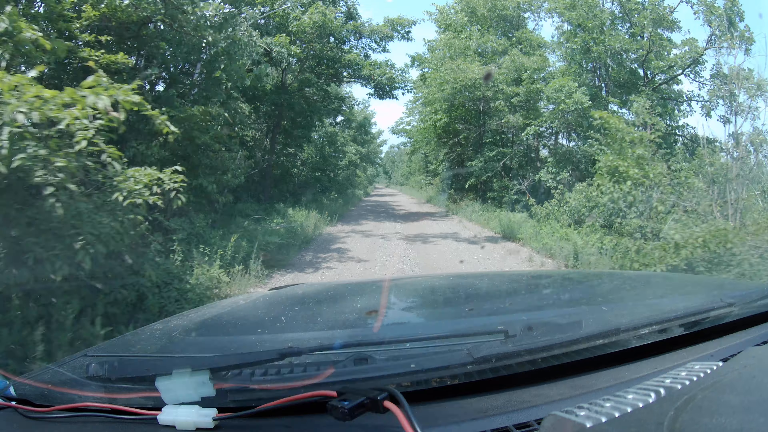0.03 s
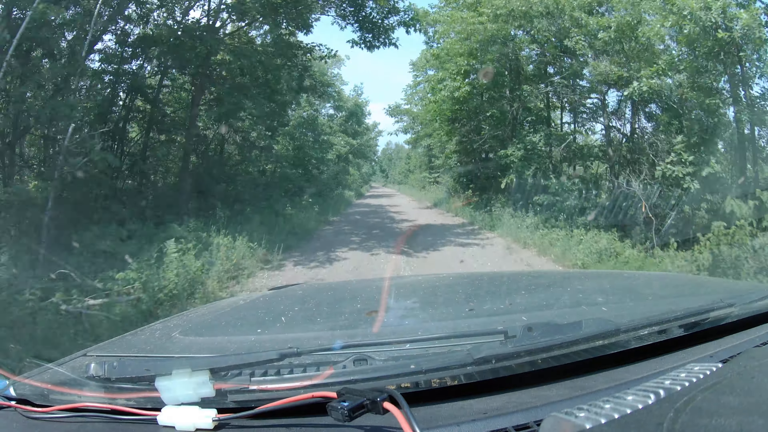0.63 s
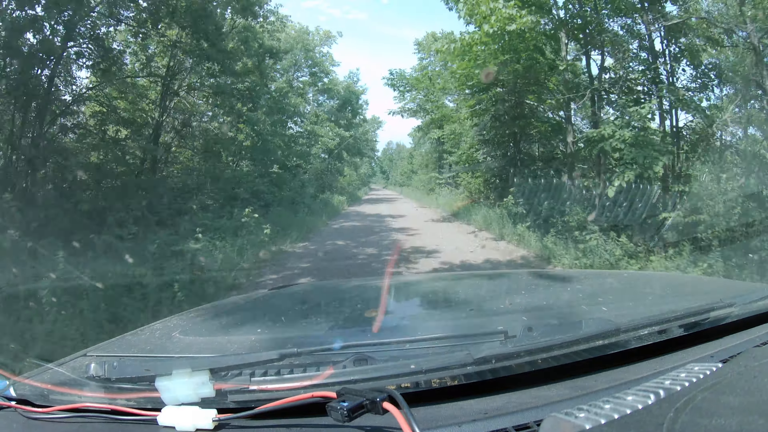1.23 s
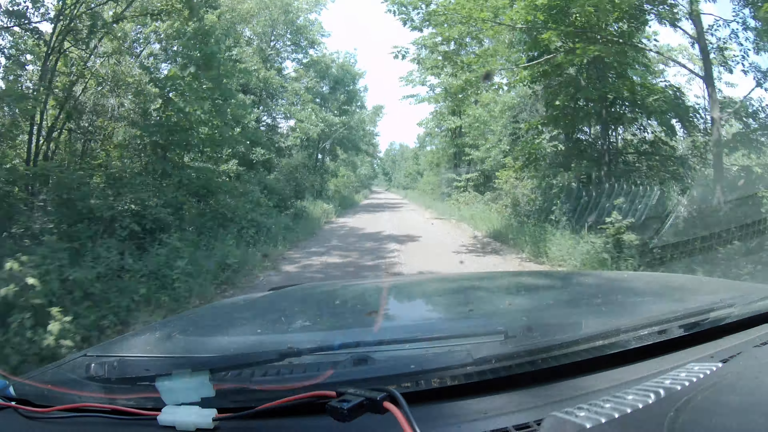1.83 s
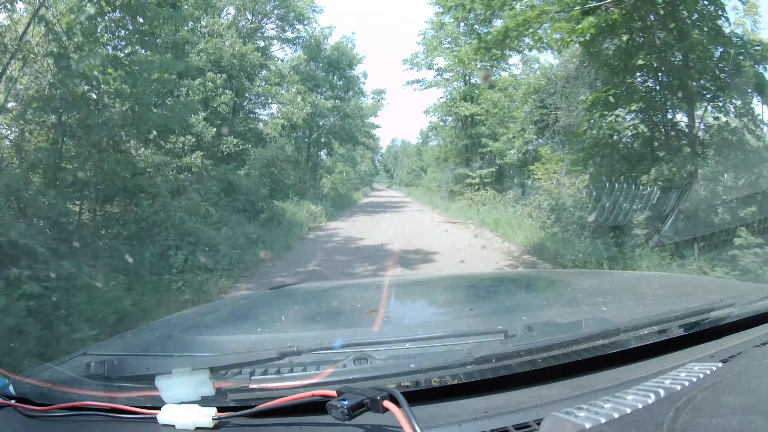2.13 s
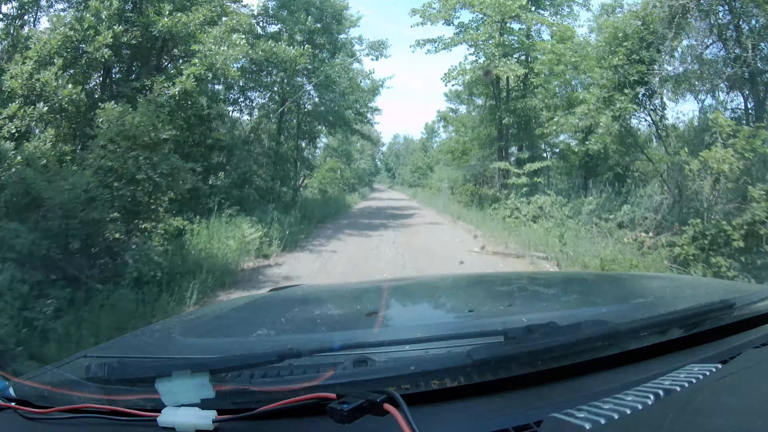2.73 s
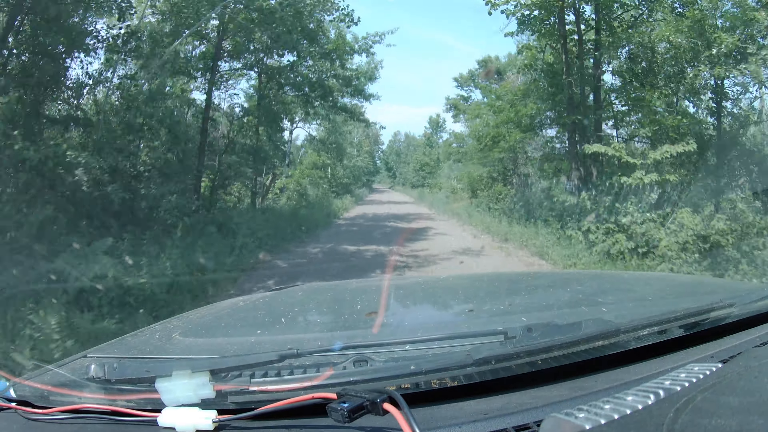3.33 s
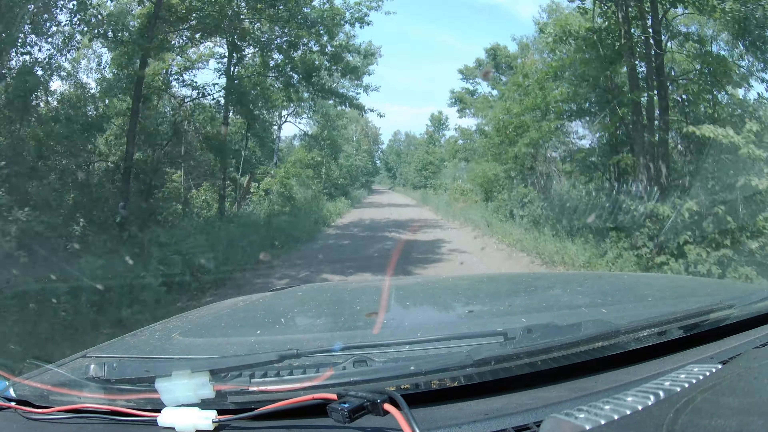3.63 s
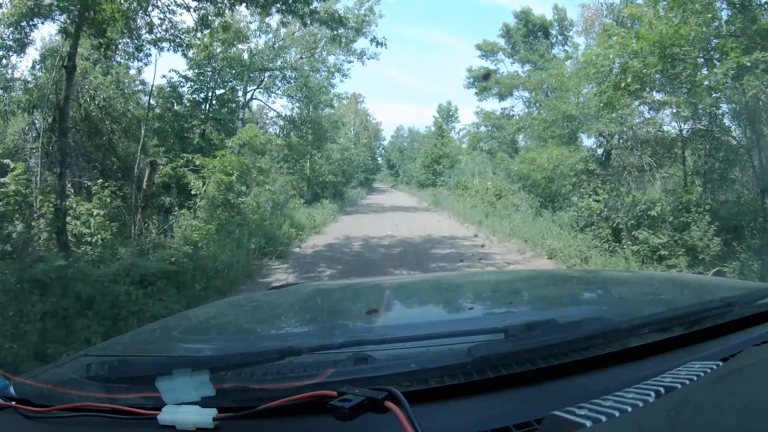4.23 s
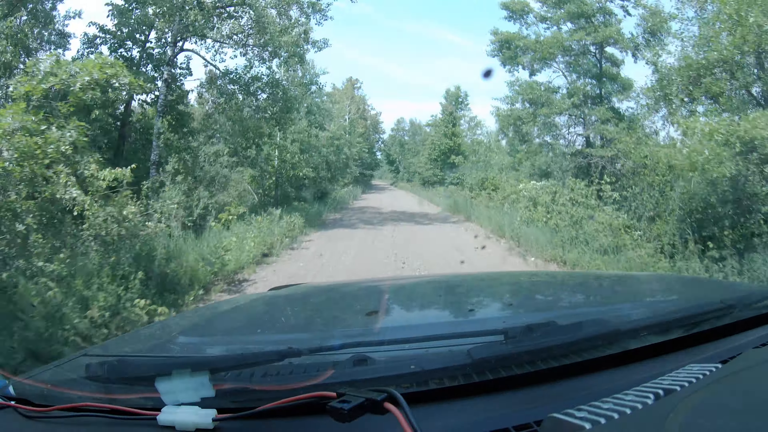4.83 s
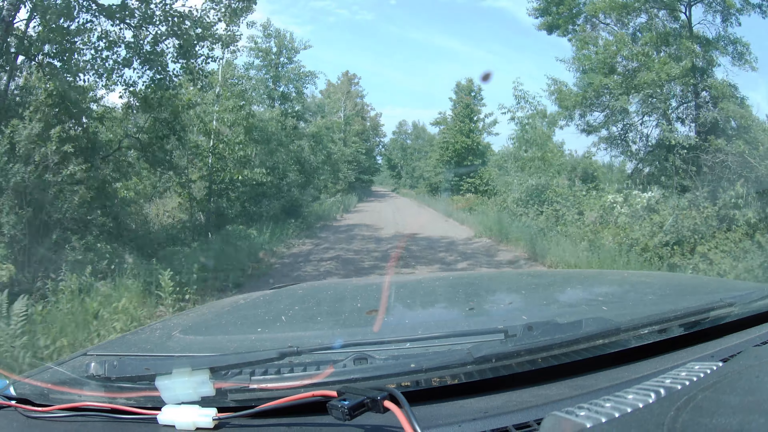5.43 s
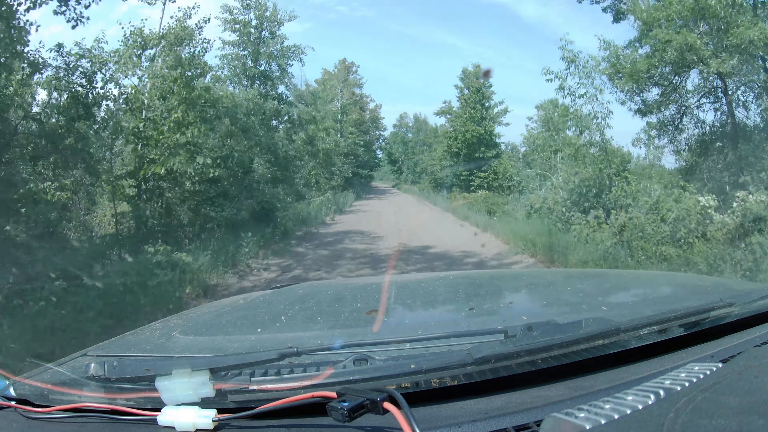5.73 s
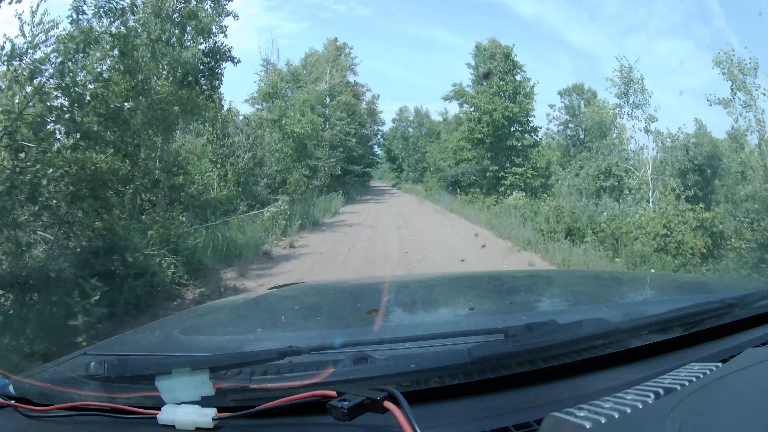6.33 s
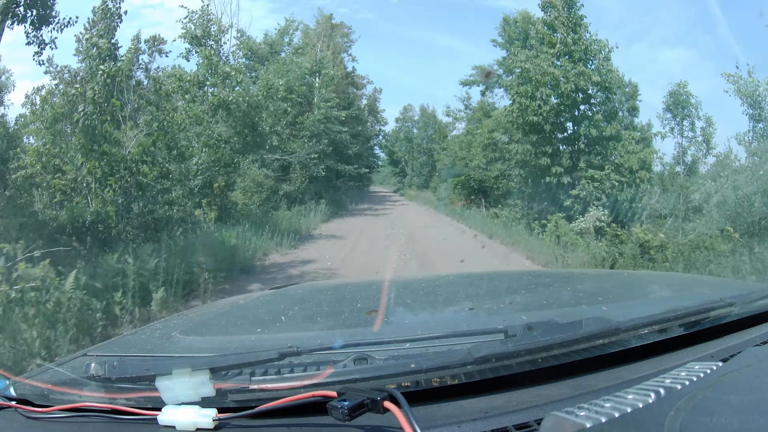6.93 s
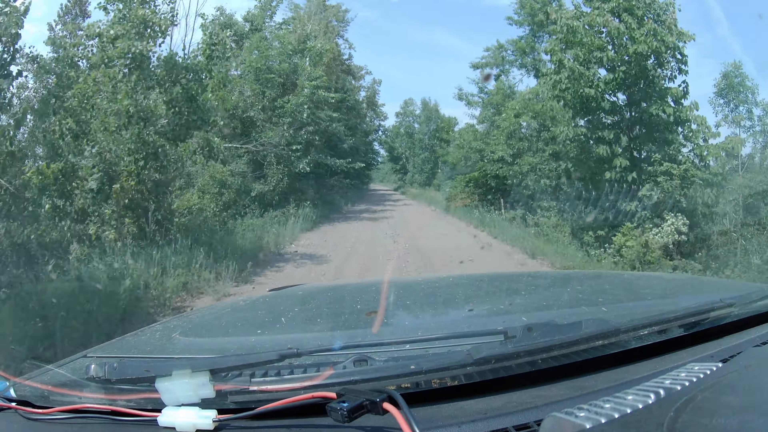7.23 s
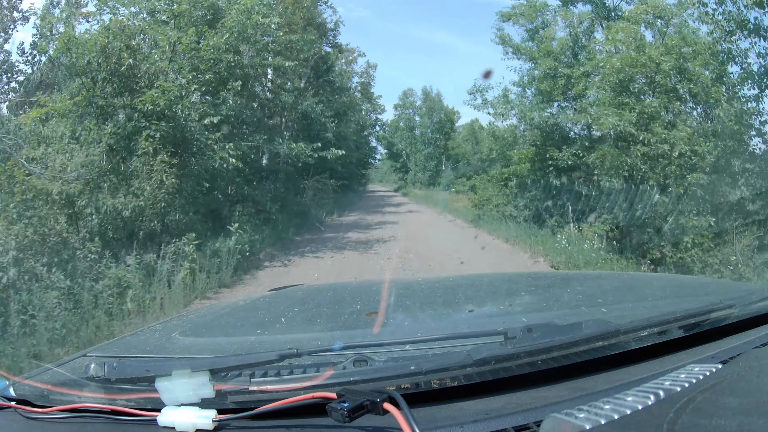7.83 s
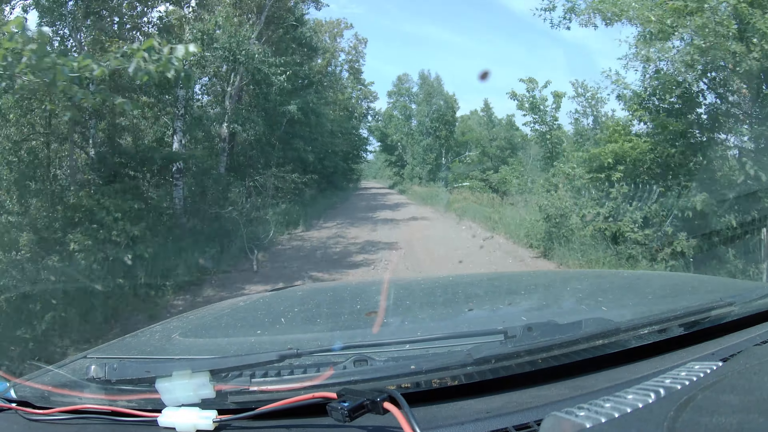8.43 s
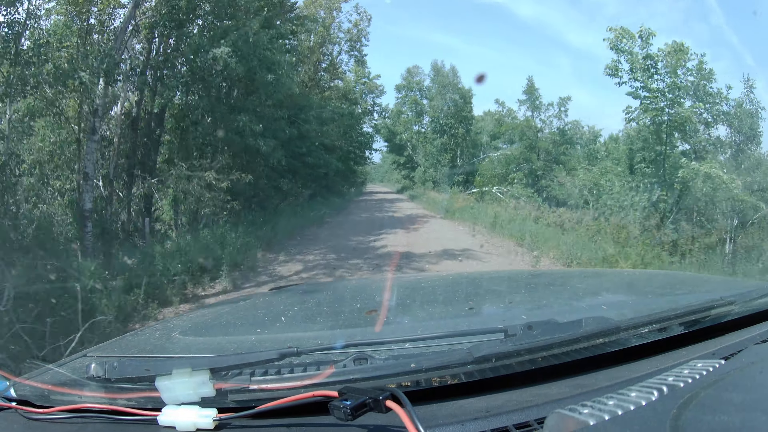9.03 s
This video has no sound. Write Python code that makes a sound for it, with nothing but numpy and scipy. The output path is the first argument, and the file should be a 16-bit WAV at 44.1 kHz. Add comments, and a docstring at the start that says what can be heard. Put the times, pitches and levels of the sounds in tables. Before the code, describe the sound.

A car drives steadily on gravel, heard from inside, with low tire rumble, engine drone and small stones clicking against the underbody.

```python
"""Driving on gravel

A car rolls along a gravel forest trail, heard from the dashboard with the windows shut. The tyres
excite the cabin's air resonances over a low engine drone and fling stones at the underbody,
whose damped modes answer each impact. Bumps thump through the suspension, a heat shield rings,
loose trim rattles, and stick-slip friction draws tiny squeaks from a plastic fitting."""
import sys
import numpy as np
from scipy import signal
from scipy.fft import rfft, irfft, next_fast_len
from scipy.io import wavfile
from scipy.ndimage import uniform_filter1d, minimum_filter1d

SR = 44100
rng = np.random.default_rng(int(sys.argv[2]) if len(sys.argv) > 2 else 0)


def waveform_to_disk(signal):
    """Save audio, clipped to [-1, 1], as 16-bit WAV at the path in sys.argv[1]."""
    frames = np.transpose(np.atleast_2d(signal))
    scaled = np.clip(frames, -1, 1) * 32767
    samples = np.round(scaled).astype(np.int16)
    wavfile.write(sys.argv[1], SR, samples)


N = 404397

# The road surface. Each row: time in seconds, then base levels of boom, roar and crunch in dB.
ROAD = [(0.04, -16, -22.5, -35.5), (1.4, -19, -21.5, -37), (1.79, -18, -22, -35), (2.18, -17.5, -20, -34.5),
        (3.15, -18.5, -21.5, -35), (3.54, -15, -19, -33), (4.12, -18.5, -22.5, -36),
        (4.9, -21.5, -21.5, -35.5), (5.09, -17.5, -20, -36), (5.48, -18.5, -21.5, -35.5),
        (7.03, -17, -19.5, -33.5), (7.62, -16, -20.5, -33.5), (8.39, -17, -21.5, -35),
        (8.78, -17, -16.5, -31), (9.17, -13.5, -19.5, -32.5)]
# Stones striking the underbody. Each row: time in seconds, strength in dB, hardness as spectral
# tilt in dB per octave.
STONES = [(0.0455, -17, -6), (0.1292, -10.5, -0.5), (0.1458, -22.0, -18), (0.181, -25, -17),
          (0.2285, -24, -13), (0.2596, -11.0, -6), (0.2705, -18, -1.5), (0.2852, -22, -16),
          (0.3292, -25, -19), (0.3742, -27, -21), (0.4167, -17.0, -12), (0.4601, -25.5, -15),
          (0.543, -13.0, -4.5), (0.554, -21.5, -7), (0.6102, -22.5, -19), (0.701, -24, -18),
          (0.784, -21.5, -12), (0.798, -16.5, -7), (0.8145, -20, -14), (0.8291, -15.5, -6),
          (0.8342, -20.5, 1.5), (0.8418, -21, -13), (0.8638, -20.5, -6), (0.8845, -34, -26),
          (0.9076, -20, -6.5), (0.9557, -25, -18), (0.9933, -14, 1), (1.0823, -14.0, 1), (1.1235, -13, -6),
          (1.1369, -16.5, -7), (1.2428, -19.5, -8), (1.2827, -16, -0.5), (1.3193, -24, -14),
          (1.365, -16, -7), (1.3874, -17, -3.5), (1.4045, -19, -13), (1.4845, -14, 3), (1.5433, -23, -23),
          (1.6004, -9.5, -3), (1.6254, -16, -7), (1.636, -27, -10), (1.6564, -23, -20), (1.6755, -24, -13),
          (1.7149, -22.5, -8), (1.7222, -20.5, -14), (1.7416, -28, -11), (1.7582, -23, -4),
          (1.8654, -17.5, -2), (1.8712, -15, 1.5), (1.8847, -27, -18), (1.9486, -21.5, -14),
          (1.9594, -20, 2.5), (2.0531, -14.5, 2.5), (2.1017, -13.0, -9), (2.184, -28, -14),
          (2.2001, -18, -9), (2.2144, -26.0, -28), (2.2214, -15, -6), (2.2705, -24, -16),
          (2.3116, -12.5, 2), (2.3277, -23.5, -8), (2.397, -10, 1), (2.4158, -21, -9),
          (2.4277, -18.5, -5.5), (2.4448, -21.5, -16), (2.457, -21, -22), (2.4718, -27, -20),
          (2.5397, -26, -12), (2.5535, -30, -15), (2.6111, -11.5, 0), (2.6447, -33, -20),
          (2.7061, -13.0, 1), (2.7221, -28, -26), (2.74, -22, -5), (2.7479, -24.5, -18),
          (2.7927, -11.5, -10.5), (2.8041, -17, -7), (2.8371, -19.5, -4.5), (2.899, -28, -18),
          (3.0111, -10, -6), (3.0799, -28, -11), (3.098, -29, -12), (3.1219, -11.5, 1.5),
          (3.1348, -22.5, -13), (3.1787, -25, -24), (3.256, -21, -1), (3.2658, -15.5, -12),
          (3.2895, -20.5, -14), (3.3107, -22, -12), (3.3465, -12.5, 1.5), (3.3891, -19.5, -17),
          (3.402, -20.0, -1.5), (3.4072, -17, -1), (3.4538, -17, -5), (3.4783, -24.5, -17),
          (3.505, -18, -10), (3.5412, -11, 1.5), (3.6241, -21.5, -28.5), (3.642, -27.5, -14),
          (3.6534, -24.5, -12), (3.6717, -21, 0), (3.6903, -21, -14), (3.7053, -21.0, -7),
          (3.7237, -29.5, -26), (3.739, -18, -3), (3.773, -17, -2), (3.8069, -22.5, -4.5),
          (3.8866, -19.5, -6), (3.9067, -20, -5), (3.924, -28.0, -10), (3.9597, -24, -3),
          (3.984, -13.5, -10.5), (3.998, -19, -3), (4.0282, -16, -17), (4.035, -20.0, -12),
          (4.0728, -22.5, -3.5), (4.1564, -11.5, 0), (4.199, -16, -5), (4.2302, -17.5, -4.5),
          (4.2806, -29.5, -21), (4.3373, -14, 1.5), (4.3543, -27.5, -8), (4.38, -29, -22),
          (4.4257, -27, -19), (4.4458, -29, -16), (4.4612, -27.5, -9), (4.4689, -26.0, -15),
          (4.4805, -28, -15), (4.5364, -27, -18), (4.5845, -27, -12), (4.667, -17, -19), (4.6852, -28, -15),
          (4.7303, -13.0, -7), (4.742, -19, -2.5), (4.7764, -26.0, -18), (4.7951, -29, -15),
          (4.8446, -20, -3), (4.8613, -23.5, -4), (4.8745, -17.0, -1.5), (4.9915, -18.5, -3.5),
          (5.0148, -29, -17), (5.1003, -11.5, -11), (5.113, -17, -1), (5.1518, -11.5, 0.5),
          (5.164, -18, -12), (5.1788, -15.5, -3), (5.2146, -25, -6), (5.2317, -23, -28), (5.2854, -26, -19),
          (5.3975, -31, -11), (5.446, -28, -8), (5.4627, -14.5, 1), (5.5447, -26.5, -18),
          (5.5858, -26.0, -17), (5.6365, -17.5, -8), (5.71, -23.5, -19), (5.7887, -19, -2),
          (5.816, -23, -4), (5.8291, -22.5, -19), (5.8436, -17.5, -4.5), (5.991, -22.5, -19),
          (6.0285, -25.5, -18), (6.0636, -24.5, -13), (6.0746, -14.5, -6), (6.0888, -13.5, -2.5),
          (6.138, -18, -11), (6.1596, -20.5, -5), (6.1943, -30, 4.5), (6.218, -22, -13), (6.2279, -9, 0),
          (6.241, -14.5, -13), (6.2564, -20, -6), (6.2947, -28, -14), (6.3089, -32, -19),
          (6.321, -19.5, -23), (6.3904, -5.5, -1.5), (6.4399, -16, -5.5), (6.4675, -15.0, -5.5),
          (6.4804, -23, -7), (6.4898, -31, -17), (6.5635, -10.5, 1.5), (6.5785, -24, -23),
          (6.598, -23.0, -10), (6.677, -11, -11), (6.6942, -23, -5), (6.7292, -16.0, -4),
          (6.7446, -13.5, -12), (6.76, -29, -8), (6.777, -26, -17), (6.829, -26.0, -16), (6.8493, -36, -14),
          (6.874, -29, -19), (6.9077, -9.5, -7.5), (6.9338, -15.5, -1.5), (6.9778, -17, -3),
          (7.0182, -22, -15), (7.036, -21, -5), (7.055, -23.0, -10), (7.0688, -16, -3.5),
          (7.1198, -28.5, -22), (7.1304, -23, -2), (7.1618, -25, -15), (7.1778, -17, -20),
          (7.2014, -12.5, 1.5), (7.2437, -30, -22), (7.2562, -10.5, -2), (7.2789, -29, 2),
          (7.3189, -11, 0.5), (7.3343, -20.5, -11), (7.3628, -19, -16), (7.3718, -18, -6),
          (7.404, -16.5, -8), (7.5156, -19.5, -14), (7.5303, -11.5, -3), (7.5457, -19, -8),
          (7.5792, -14.0, -4), (7.5918, -14.5, -3), (7.597, -19, -5), (7.6289, -16, -3), (7.6449, -27, -14),
          (7.6914, -19, -2), (7.7368, -17.5, 0.5), (7.7506, -26, -10), (7.7845, -17, 0.5),
          (7.7926, -18.0, -21), (7.7996, -16.5, 1.5), (7.8381, -25, -18), (7.8804, -24, -5),
          (7.8955, -24, -11), (7.9107, -19.5, -2), (7.9236, -16, -19), (7.9453, -24, -8), (7.993, -21, -4),
          (8.0068, -13, -2), (8.0963, -21.5, -10), (8.1865, -32, -28), (8.2632, -14, -11), (8.2744, -26, 2),
          (8.308, -15, -7), (8.3225, -19.5, -3), (8.3644, -13.5, -1), (8.3789, -24, -13),
          (8.3879, -14.5, 0.5), (8.4721, -24, -15), (8.4882, -20, -14), (8.4934, -15.5, -3),
          (8.521, -24, -7), (8.565, -20.5, 1), (8.6029, -8.5, -1.5), (8.62, -16, 0), (8.6389, -24, -7),
          (8.651, -10.5, -4), (8.668, -23, -26), (8.6773, -15.5, -6), (8.795, -9, -1), (8.8243, -22, 0),
          (8.8418, -17.5, -11), (8.8843, -16.5, -3), (8.908, -23, -5), (8.9219, -21.0, -5),
          (8.9419, -13.0, -12), (8.9582, -17, -1.5), (9.0115, -32, -22), (9.0314, -32.0, -22),
          (9.0473, -19, -15), (9.0581, -20, -3), (9.074, -10, -11), (9.0906, -33.5, 5), (9.129, -27, -26),
          (9.135, -21, -20)]


def gain_of(db):
    """Amplitude ratio of a level in decibels."""
    return 10 ** (np.asarray(db) / 20)


def unit_rms(x):
    """Normalisation to an rms of 1."""
    return x / np.sqrt(np.mean(x ** 2) + 1e-20)


def at_frequency(points, hz):
    """Interpolation along a logarithmic frequency axis."""
    point_hz, value = np.transpose(points)
    return np.interp(np.log(hz + 1), np.log(point_hz + 1), value)


def curve(rows, column):
    """Linear interpolation of one column of a time table, at every sample."""
    rows = np.asarray(rows)
    return np.interp(np.arange(N) / SR, rows[:, 0], rows[:, column])


def add(mix, start_s, sound):
    """Superposition of a stereo sound on the mix."""
    part = mix[:, max(round(start_s * SR), 0):][:, :sound.shape[1]]
    part += sound[:, :part.shape[1]]


def wander(cutoff_hz):
    """Low-pass Gaussian noise: a slow random fluctuation of rms 1."""
    hz = np.fft.rfftfreq(N, 1 / SR)
    return unit_rms(irfft(rfft(rng.standard_normal(N)) * np.exp(-(hz / cutoff_hz) ** 2), N))


def cabin_noise(spectrum):
    """Partial coherence: coloured noise, most alike left and right in the bass; their mean has rms 1."""
    # The sound field. Each row: frequency in Hz, coherence, left minus right in dB, left lead in radians.
    field = [(22, .985, -4, .12), (55, .993, -2.3, .31), (130, .986, -.4, .27), (350, .99, 1, .1),
             (550, .975, 1.8, .06), (1150, .9, 5, -.13), (1500, .85, 5.5, -.5), (2100, .3, 4, -1.5),
             (3000, .4, 1, -2)]
    size = next_fast_len(N)
    hz = np.fft.rfftfreq(size, 1 / SR)
    shared, own = rfft(rng.standard_normal((2, size)))
    coherence, lean_db, lead = (at_frequency(np.array(field)[:, [0, k]], hz) for k in range(1, 4))
    lean = gain_of(lean_db / 2)
    right = (coherence * shared + np.sqrt(1 - coherence ** 2) * own) * np.exp(-1j * lead)
    colour = gain_of(at_frequency(spectrum, hz)) / (1 + (hz / spectrum[-1][0]) ** 4)
    pair = irfft(np.array([shared * lean, right / lean]) * colour, size)[:, :N]
    return pair / pair.mean(0).std()


def swells_db(half_width_s=0.032):
    """Amplitude modulation: brief swells and lulls in the low rumble."""
    # Swells and lulls. Each row: time in seconds, level change in dB.
    swells = [(.08, 1), (.14, 6), (0.462, 3.5), (.82, -1), (1.321, 4.5), (1.859, 5.5), (2.29, 2),
              (2.47, 6.5), (2.749, 6.5), (2.921, 6), (3.01, -9), (3.06, 7.5), (3.209, 7), (3.878, 8.5),
              (3.97, -4), (4.62, 8.5), (5.041, 7.5), (5.358, 5), (5.45, -8.5), (5.871, 1.5), (6.5, 7.5),
              (7.12, 13), (7.48, 11), (7.629, 2), (8.111, 4), (8.44, -5)]
    t = np.arange(N) / SR
    return sum(db / (1 + ((t - s) / half_width_s) ** 2) ** 2 for s, db in swells)


def rolling(roar_db=-1.0, crunch_db=-0.02, lumpy_db=3.0, steadiness=0.35):
    """Random excitation: the road drives the cabin's air resonances; the tread roars and grinds gravel."""
    # Spectra of cabin, tyres and gravel. Each row: frequency in Hz, relative spectral density in dB.
    boom_spectrum = [(8, -28), (20, -8.5), (38, -9.5), (50, -3), (62, 5), (70, -8.5), (87, -8), (96, -4),
                     (110, -23), (160, -44)]
    roar_spectrum = [(70, -34), (108, -4), (130, 2), (150, -5.5), (175, -11), (220, -5.5), (260, -13),
                     (320, -9.5), (400, -15.5), (520, -19.5), (900, -48.5)]
    crunch_spectrum = [(280, -22), (450, -4), (550, -3), (630, 1), (700, -4.5), (800, -0.5), (1000, -8.5),
                       (1500, -15.5), (1800, -23), (2100, -20), (3300, -45.5), (4500, -45), (6000, -50.5),
                       (7000, -65)]
    boom = cabin_noise(boom_spectrum)
    envelope = np.sqrt(abs(uniform_filter1d(boom.mean(0) ** 2, size=3000)) + 1e-6)
    boom = boom / envelope ** steadiness  # partly evens out the noise's own fluctuations
    boom *= gain_of(curve(ROAD, 1) + swells_db())
    roar = cabin_noise(roar_spectrum) * gain_of(curve(ROAD, 2) + roar_db)
    crunch = cabin_noise(crunch_spectrum) * gain_of(curve(ROAD, 3) + crunch_db + lumpy_db * wander(59))
    return boom + roar + crunch


def engine(speed_jitter=0.005, flutter_db=2.5):
    """Engine orders: four cylinders under light load drone at harmonics of the crankshaft's rotation."""
    # The crankshaft. Each row: time in seconds, speed in turns per second, drone level in dB.
    crank = [(0, 35.64, -27.5), (.7, 33.08, -23), (1.5, 31.58, -41), (2.0, 37.02, -26), (2.8, 38.55, -34.5),
             (3.7, 39.35, -26), (3.95, 33.15, -24.5), (4.5, 33.43, -24.5), (5.2, 31.92, -32),
             (5.9, 35.1, -22.5), (6.8, 36.87, -23.5), (7.3, 32.28, -28), (8.2, 32.27, -38),
             (9.17, 33.67, -21.5)]
    # The orders. Each row: multiple of the crank speed, relative level in dB.
    orders = [(2, -2), (3, -14.5), (4, -2), (5, -13.5), (6, -16)]
    turns = np.cumsum(curve(crank, 1) * (1 + speed_jitter * wander(5))) / SR
    drone = np.zeros(N)
    for order, db in orders:
        drone += gain_of(db + flutter_db * wander(9)) * np.sin(2 * np.pi * (order * turns + rng.random()))
    return unit_rms(drone) * gain_of(curve(crank, 2))


def after_stones(decay_s=0.016, knee_db=-15.5):
    """Exponential decay: an envelope that jumps at each stone click and dies away, saturating at 1."""
    t = np.linspace(0, N / SR, num=4000)
    decays = sum(gain_of(db - knee_db) * (t > s) * np.exp(-abs(t - s) / decay_s) for s, db, _ in STONES)
    return np.interp(np.arange(N) / SR, t, np.tanh(decays))


def hiss(swell_db=-60, steady_db=-70):
    """Modulated noise: a faint high hiss swells briefly after each stone click."""
    # Each row: frequency in Hz, relative spectral density in dB.
    spectrum = [(1200, -20.5), (2200, 0.5), (2800, -2.5), (3500, 0.5), (4600, -7), (5900, -5), (6500, -13),
                (7800, -12), (8400, -29)]
    return cabin_noise(spectrum) * (gain_of(steady_db) + gain_of(swell_db) * after_stones())


def stone(strength_db, hardness, scatter_db=1.4, detune=0.03, linger=1.0, lead_s=0.002):
    """Modal impact: a harder stone rings the panel more brightly; comb filtering makes it hollow."""
    # Damped modes of the underbody. Each row: frequency in Hz, base decay time in ms, relative level in dB.
    modes = [(1151, 3.6, -26.5), (1552, 1.3, -12), (3000, 3.3, -19.5), (2743, 0.42, 0), (6060, .37, -11)]
    # Paths through the bulkhead and off the glass, to each side. Each row: delay in ms, signed gain.
    paths_left = [(.05, .46), (.3, -.95), (.6, 1), (.84, .56), (1.45, .72), (2.63, .4)]
    paths_right = [(0, .48), (.17, -.53), (.37, -.45), (.88, -.46), (1.36, -.38), (2.28, -.16)]
    hz = np.fft.rfftfreq(512, 1 / SR)
    s = 2j * np.pi * hz / 1000  # Laplace variable, per ms
    mode_hz, decay_ms, db = np.transpose(modes)[:, :, None]
    size, shift, hold = np.clip(rng.standard_normal((3, len(modes), 1)), -2, 2)  # each spot differs
    decay_ms = decay_ms * linger * 2 ** (0.3 * hold - 0.018 * hardness)  # dull blows ring longer
    omega = 2 * np.pi * mode_hz * (1 + detune * shift) / 1000
    resonances = gain_of(db + scatter_db * size) * omega / ((s + 1 / decay_ms) ** 2 + omega ** 2)
    ring = resonances.sum(0) * SR / 1000

    pivot_hz, soft_hz = 1770, 3400
    blow = gain_of(strength_db + hardness * np.log2(np.clip(hz, 1280, 4800) / pivot_hz))
    blow *= gain_of(0.79 * min(hardness, 0) * np.log2(np.maximum(hz / soft_hz, 1)))  # soft: less treble

    delay_ms, gain = np.array([paths_left, paths_right]).transpose(2, 0, 1)[..., None]
    gain = gain * gain_of(rng.standard_normal(gain.shape))  # 1 dB of scatter
    paths = (gain * np.exp(-s * delay_ms)).sum(1)
    return np.roll(irfft(ring * blow * paths), round(lead_s * SR), axis=1)  # room to swell to the peak


def grit(level_db=-2, spread_db=2.0, count=520):
    """Shot noise: dull pebbles land at random, louder on coarse gravel and sharper just after a stone."""
    out, crunch_db, sharpening = np.zeros((2, N)), curve(ROAD, 3), after_stones()
    landings = rng.integers(0, N, count)
    for at, (size, hard) in zip(landings, np.clip(rng.standard_normal((count, 2)), -2, 2)):
        db = crunch_db[at] + level_db + spread_db * size
        hardness = -13 + 4 * sharpening[at] + 2 * hard  # dB per octave
        add(out, at / SR, stone(db, hardness, scatter_db=5.0, detune=0.06, linger=1.35))
    return out


def gravel(lead_s=0.002):
    """Impulsive excitation: stones flung by the tyres knock on the underbody."""
    out = np.zeros((2, N))
    for s, db, hardness in STONES:
        add(out, s - lead_s, stone(db, hardness, lead_s=lead_s))
    return out


def squeaks(width_s=0.0042, glide=0.035, wobble=0.04, stutter_db=5, octave_db=-21):
    """Stick-slip friction of plastic: a brief sagging tone that stutters in pitch and level if rough."""
    # Each row: centre time in seconds, relative level in dB, pitch in Hz, roughness from 0 to 1.
    slips = [(0.118, -48, 3680, 0.24), (0.223, -47, 3650, 0.4), (0.33, -59, 3730, 0.5),
             (0.498, -53, 3760, 0.4), (0.62, -57, 3780, .6), (0.765, -49, 3670, 0.5),
             (1.033, -63, 3700, 0.1), (1.106, -41, 3730, 0.33), (1.252, -48.5, 3870, .8),
             (1.403, -54, 3900, .6), (1.574, -43, 3840, 0.4), (1.673, -45, 3900, 0.2),
             (1.9, -36.5, 3720, .4), (1.988, -44, 3730, .3), (2.081, -44, 3890, 0.3),
             (2.171, -45, 3780, 0.45), (2.331, -46, 3900, 0.5), (3.094, -51, 3760, .7),
             (3.486, -44.5, 3600, 0.2), (3.735, -44, 3880, .5), (3.927, -44.5, 3990, 0.1),
             (4.009, -30, 3910, 0.2), (4.596, -42, 3970, 0.2), (4.801, -47, 3830, 0.5),
             (4.912, -53, 3820, 0.4), (5.065, -38, 3830, .4), (5.227, -38, 3940, 0.1),
             (5.343, -47, 3990, 0.29), (5.415, -45.5, 4010, 0.1), (5.95, -42, 3980, 0.9),
             (6.111, -45, 3800, 0.5), (6.64, -36.5, 3920, .5), (6.812, -35, 3930, 0.5),
             (6.983, -43, 3850, 0.5), (7.115, -36, 3930, 0.36), (7.919, -42, 3940, 0.6),
             (7.96, -51, 4120, 0.8), (7.993, -39, 3860, 0.7), (8.41, -38.5, 3730, 0.65),
             (8.557, -40.5, 3986, 0.16), (8.66, -37, 3920, 0.54), (8.908, -45, 3770, .9),
             (9.159, -34, 3820, 0.4)]
    # Paths, direct and off the windscreen. Each row: delay in seconds, left and right gain in dB.
    paths = [(0, -5, 3), (.00245, 0, -12), (.00632, -8, -4)]
    out, t = np.zeros((2, N)), np.arange(-900, 900) / SR
    for (s, db, hz, rough), (stretch, sag) in zip(slips, rng.random((len(slips), 2))):
        age = t / (width_s * 2 ** (stretch - 0.5))
        noise = rng.standard_normal((2, len(t)))
        slip, grip = unit_rms(signal.oaconvolve(noise, np.hanning(100)[None], "same"))
        pitch_hz = hz * (1 - glide * (0.21 + sag) * np.tanh(age) + wobble * rough * slip)
        phase = 2 * np.pi * np.cumsum(pitch_hz) / SR
        tone = (np.sin(phase) + gain_of(octave_db) * np.sin(2 * phase)) / np.cosh(2 * age)
        tone *= gain_of(db + stutter_db * rough * grip)
        for delay, left_db, right_db in paths:
            add(out, s + t[0] + delay, tone * gain_of([[left_db], [right_db]]))
    return out


def bumps(level_db=3.0, swell_s=0.005, ring_db=-8, ring_t60=0.1, rebound_db=-8, rebound_s=0.00993):
    """Damped chassis modes: a rut gives a dull thud, a weaker rebound and a faint ring of the main mode."""
    # Suspension thumps. Each row: start in seconds, relative level in dB, pitch in Hz.
    thumps = [(0.987, -15, 214), (1.264, -15.5, 209), (3.346, -13, 191), (3.509, -13, 210),
              (3.917, -11, 238), (6.532, -17, 218), (6.951, -13.5, 213), (7.074, -9, 230),
              (7.363, -13, 224), (7.952, -14, 217), (8.635, -16, 240), (8.692, -5.5, 257),
              (8.806, -10.5, 278), (8.922, -9, 262), (9.0454, -7.5, 255), (9.139, -6.5, 266)]
    # Chassis modes. Each row: nominal multiple of the thump pitch, relative level in dB.
    modes = [(0.719, -4.5), (1, 1.5), (1.3, 2)]
    out, t = np.zeros((2, N)), np.arange(5000) / SR
    age, from_peak = t / swell_s, t - swell_s
    for s, db, hz in thumps:
        phase = 2 * np.pi * hz * from_peak
        hit = sum(gain_of(mode_db) * np.sin(phase * k * rng.uniform(0.73, 1.15)) for k, mode_db in modes)
        thud = hit * age ** 2 * np.exp(2 * (1 - age))
        thud /= abs(thud).max()
        ring = np.sin(phase) * np.tanh(age) * gain_of(ring_db - 60 * t / ring_t60)
        add(out, s, gain_of(db + level_db) * (thud + ring) * gain_of([[0.5], [-0.5]]))
        add(out, s + rebound_s, gain_of(db + level_db + rebound_db) * thud * np.ones((2, 1)))
    return out


def heat_shield(t60=0.036, rise_s=0.00092, left_db=3):
    """Free vibration: jarred by a few of the stones, a thin shield on the left rings in two short notes."""
    # Each row: start in seconds, relative level in dB, pitch in Hz.
    notes = [(1.601, -22, 1130), (1.602, -29, 2810), (1.871, -18, 1100), (2.705, -15, 1095),
             (3.408, -18.5, 1100), (3.773, -28.5, 2770), (4.8745, -23.5, 1134), (4.875, -31.5, 2760),
             (5.178, -31.5, 2810), (7.593, -23, 1125), (8.008, -25, 2804), (8.648, -22, 1130)]
    out, t = np.zeros((2, N)), np.arange(3000) / SR
    for s, db, hz in notes:
        envelope = gain_of(db - 60 * t / t60) * (1 - np.exp(-t / rise_s))
        add(out, s, envelope * np.sin(2 * np.pi * hz * t) * gain_of([[left_db], [-left_db]]))
    return out


def rattles(level_db=-3, fall_db=4.8, spread_s=0.038, rise_s=0.00035, t60=0.043, count=6):
    """Repeated impacts: loose trim chatters in a quick cluster of weakening hollow knocks. A few rows, such as
    those at 4.155 and 7.254 s, are instead the low, hollow knock of a stone on the underbody, played the same
    way."""
    # Each row: start in seconds, relative level in dB, nominal pitch in Hz.
    clusters = [(3.437, -16.5, 830), (3.624, -20, 786), (4.029, -20, 1180), (4.046, -10.5, 870),
                (4.155, -15, 1110), (6.465, -17, 1100), (7.008, -15, 770), (7.254, -12.5, 1010),
                (7.733, -16.5, 1043), (8.445, -14.5, 640), (8.676, -15, 890), (8.734, -9, 870),
                (8.757, -19, 1400), (8.786, -12.5, 848), (8.823, -16, 1150), (8.854, -14, 666),
                (9.07, -12, 700), (9.129, -15.5, 1300)]
    out, t = np.zeros((2, N)), np.arange(1500) / SR
    envelope = (1 - np.exp(-(t / rise_s) ** 2)) * gain_of(-60 * t / t60)
    for s, db, hz in clusters:
        for k, (late, pitch) in enumerate(rng.random((count, 2))):
            tone = np.sin(2 * np.pi * hz * (0.7 + 0.5 * pitch) * t)
            knock = gain_of(db + level_db - fall_db * k) * envelope * tone
            add(out, s + spread_s * late * k / count, knock * gain_of([[2], [-2]]))
    return out


def through_floor(x, cutoff_hz=5680):
    """Transmission loss: the carpeted floor takes the top off each knock from below."""
    return signal.sosfilt(signal.butter(N=10, Wn=cutoff_hz, fs=SR, output="sos"), x)


def cabin_reverb(x, tail_db=-24, t60=0.14):
    """Absorption: the seats soak up nearly all echo and leave a faint, short tail."""
    t = np.arange(5000) / SR
    tail = rng.standard_normal((2, len(t))) * gain_of(-60 * t / t60)
    return x + gain_of(tail_db) * signal.oaconvolve(x, tail / np.linalg.norm(tail[0]), axes=1)[:, :N]


def scene():
    """Superposition of all sources at the dashboard."""
    ride = rolling() + engine() + bumps() + hiss()
    transients = through_floor(gravel() + grit()) + heat_shield() + rattles() + squeaks()
    return ride + cabin_reverb(transients)


def record(dry):
    """Peak and band limiting: after a quick fade-in, the largest peaks and the top treble are cut."""
    start_s, fade_s, ceiling, edge_hz = 0.037, 0.0083, 0.9, 13000
    faded = dry * np.clip((np.arange(N) / SR - start_s) / fade_s, 0, 1)
    gain = ceiling / np.maximum(abs(faded).max(0), ceiling)
    limited = faded * uniform_filter1d(minimum_filter1d(gain, size=441), size=441)
    lowpass = signal.firwin(255, edge_hz, window=("kaiser", 9), fs=SR)
    return signal.oaconvolve(limited, lowpass[None], "same")


dry = scene()
out = record(dry)
waveform_to_disk(out)
```